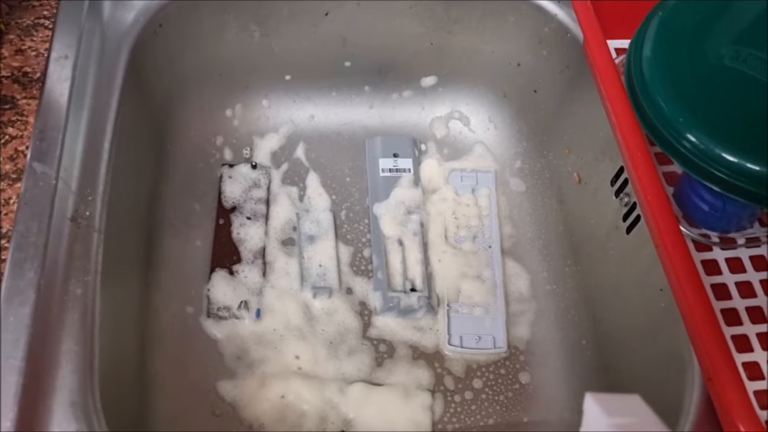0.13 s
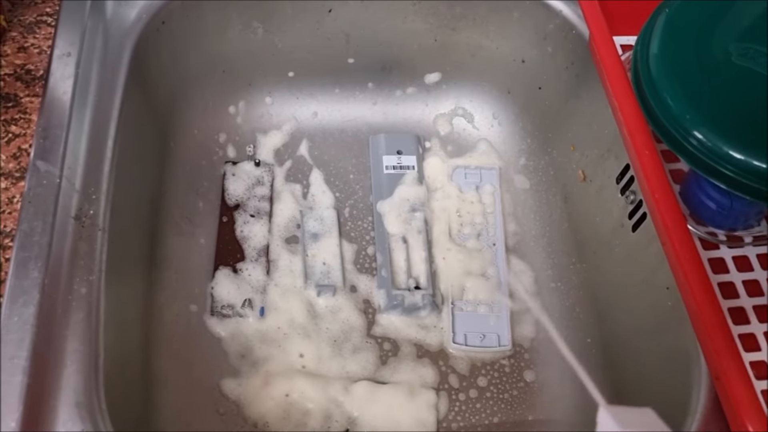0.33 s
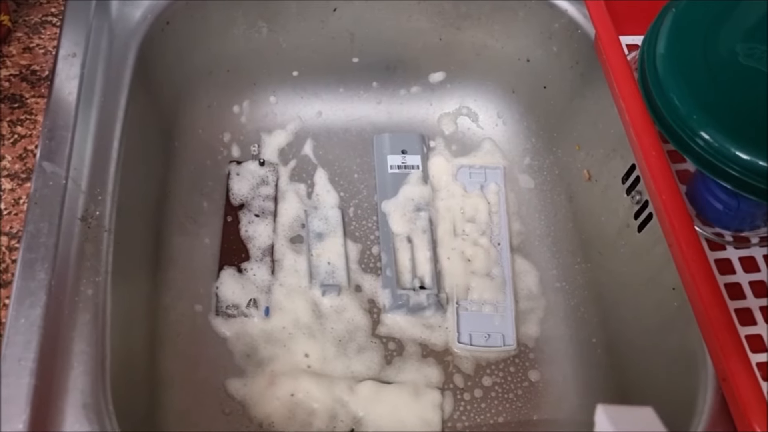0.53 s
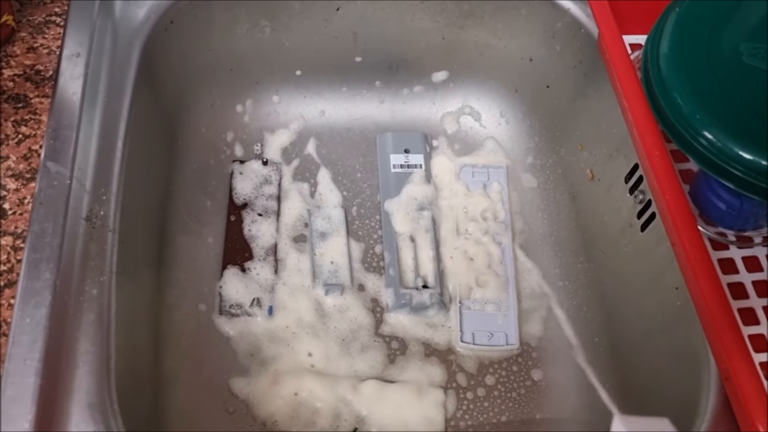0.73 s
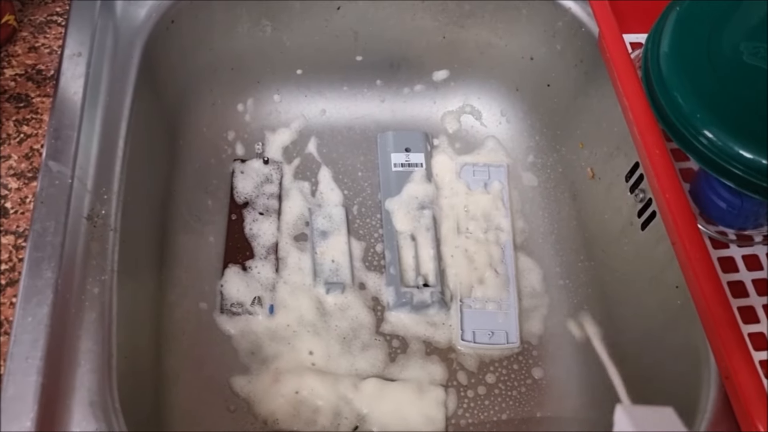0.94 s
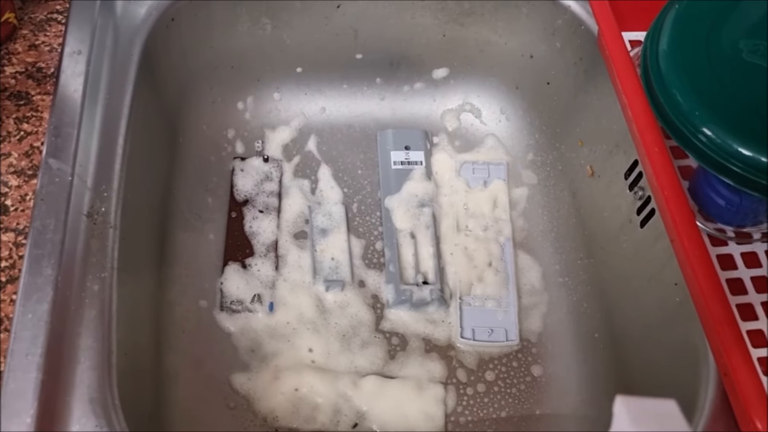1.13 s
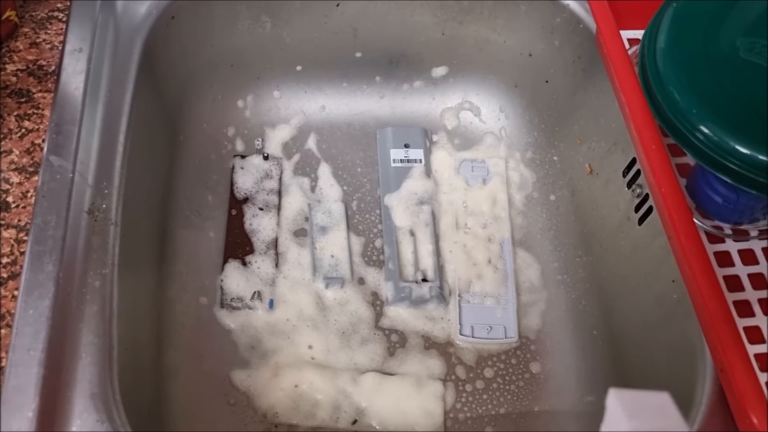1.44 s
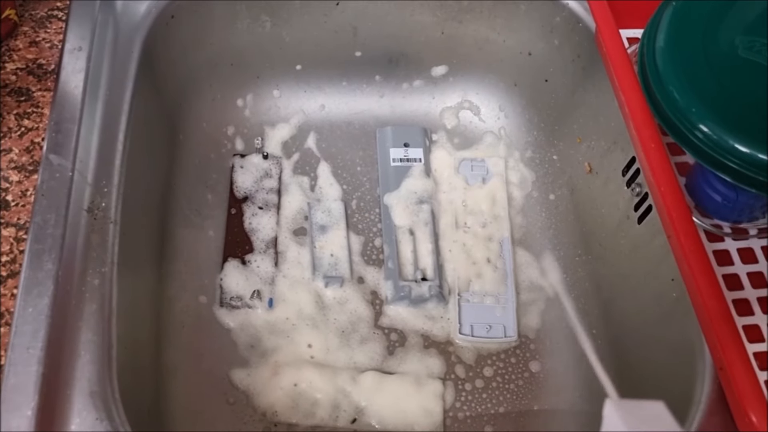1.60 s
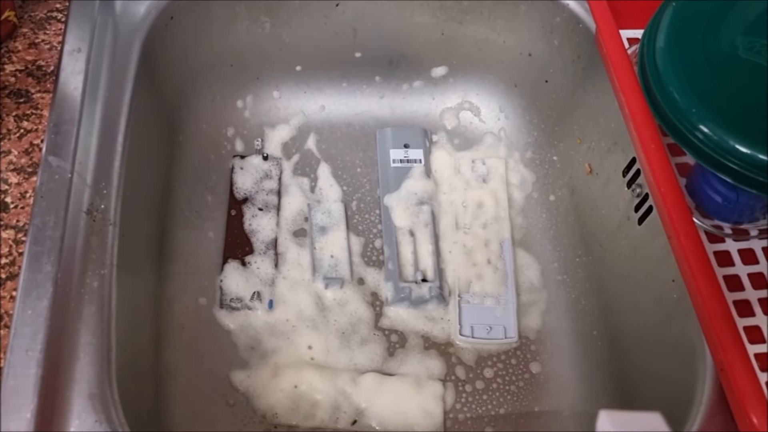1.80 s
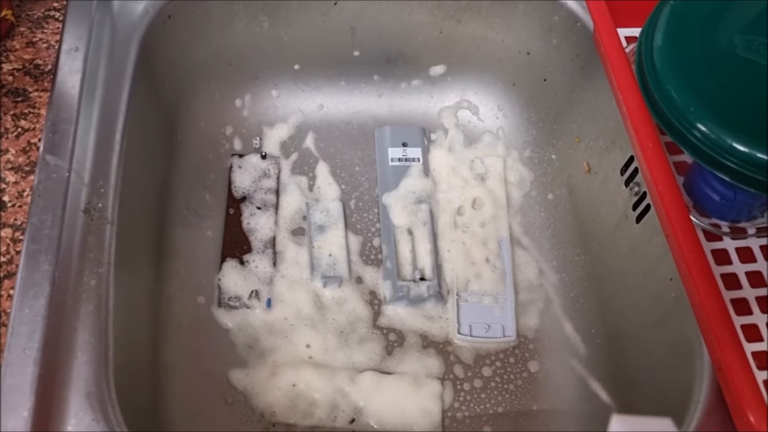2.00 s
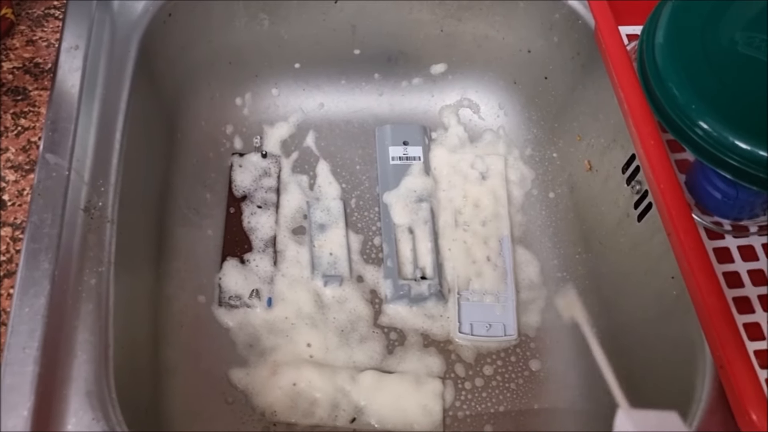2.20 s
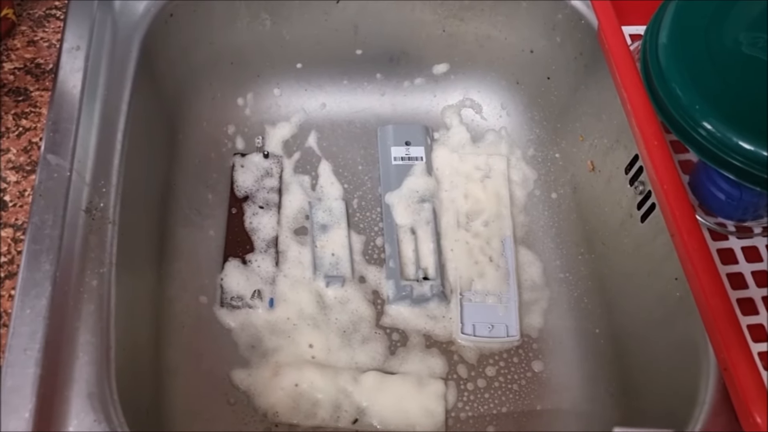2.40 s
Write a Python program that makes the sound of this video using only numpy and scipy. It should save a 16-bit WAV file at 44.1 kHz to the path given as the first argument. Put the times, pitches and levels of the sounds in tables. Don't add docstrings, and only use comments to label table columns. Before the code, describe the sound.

Trigger spray bottle pumped rapidly eight times, squirting hissing, whistling foamy jets into a kitchen sink.

```python
import sys
import numpy as np
from scipy import signal
from scipy.fft import rfft, irfft
from scipy.io import wavfile
from scipy.ndimage import uniform_filter1d

SR = 44100
rng = np.random.default_rng(int(sys.argv[2]) if len(sys.argv) > 2 else 0)


def boost_factor(decibels):
    exponent = np.asarray(decibels, float) / 20
    return 10 ** exponent


def pcm_store(signal):
    levels = np.round(np.clip(np.atleast_2d(signal), -1, 1) * 32767)
    wavfile.write(sys.argv[1], SR, levels.astype(np.int16).T)


N = 112454

# f/Hz, level/dB
ROOM_AIR = [(12, 0), (20, -19), (68, 6.5), (949, -9.5), (1330, 1.5), (1960, -16), (2750, -13),
            (3740, -17.5), (16000, -25.5)]
# f/Hz, likeness/1
AIR_LIKENESS = [(60, 0.86), (290, 0.61), (1400, 0.07), (3000, 0.07)]
# f/Hz, level/dB
HUM_PARTIALS = [(40.3, -60.5), (80.6, -61), (121, -71.5), (161.2, -65), (282, -77.5), (296, -70.5),
                (398, -75)]
# t/s, level/dB, f/Hz, t60/s
BODY_KNOCKS = [
    (.046, -36.5, 71.2, 0.28),
    (0.082, -32.5, 87.5, 0.11),
    (0.141, -38.5, 73.6, 0.094),
    (.182, -49, 304.7, 0.19),
    (0.215, -47, 287, 0.11),
    (0.576, -44.5, 153, 0.22),
    (.595, -47.5, 117, 0.31),
    (0.879, -55, 309.4, 0.33),
]
# t/s, pop level/dB, whistle level/dB, hiss level/dB, length/s
SQUEEZES = [
    (0.0485, -50, -38.5, -35, 0.17),
    (0.399, -44.5, -38, -37, .16),
    (0.721, -46, -39.5, -39.5, .16),
    (1.031, -46.5, -37.5, -39, .15),
    (1.3556, -43, -37, -38, .16),
    (1.6785, -43.5, -37, -36.5, 0.15),
    (1.9887, -42.5, -37, -38.5, .15),
    (2.2933, -45.5, -39, -42, .15),
]
# t/s, level/dB
PUMP_SUCKS = [
    (0.191, -49.5),
    (0.551, -52),
    (.873, -48.5),
    (1.186, -55),
    (1.501, -55),
    (1.82, -47),
    (2.138, -54),
    (2.439, -51),
]
# t/s, level/dB, brightness/dB
TRIGGER_TICKS = [(.005, -65, 13), (0.018, -51, -18), (.026, -46.5, -16), (0.191, -45, -15),
                 (0.209, -47, -16), (0.225, -38.5, -30), (0.262, -42.5, -6), (0.279, -47, -19),
                 (0.342, -54, 9), (.375, -47.5, -12), (0.38, -46.5, -3), (0.527, -40.5, -6),
                 (0.589, -45, -10), (0.61, -41.5, -20), (0.680, -54, 13), (0.682, -59, 12),
                 (0.702, -50, -8), (.705, -45.5, 4), (0.713, -51, -3), (.853, -42.5, -12), (0.874, -36, -1),
                 (0.917, -44.5, -4), (0.941, -45.5, -24), (1.017, -39, 3), (1.189, -47, -14),
                 (1.232, -46, 0), (1.329, -52, -13), (1.342, -39, 4), (1.499, -46.5, -8), (1.515, -44, -2),
                 (1.562, -39, -1), (1.663, -39, 2), (1.749, -44.5, -15), (1.87, -43, -6),
                 (1.912, -44.5, 5.5), (1.967, -52, -3), (1.9744, -43.5, -1), (1.978, -41, 12.5),
                 (2.177, -40.5, -4), (2.198, -48.5, -10), (2.276, -45.5, -3), (2.2811, -42, 9.5),
                 (2.474, -41.5, -12), (2.497, -49, -17)]
# f/Hz, level/dB, t60/s
HEAD_MODES = [(340, -19, .03), (580, -17, .03), (830, -13, .02), (1220, -4, .008), (1390, -1, .009),
              (1620, -6, .008), (2350, -10, .006), (2750, -7, .007), (3050, -3, .009)]
# f/Hz, level/dB
SNAP_COLOUR = [(2000, -64), (4000, 5), (5200, 12), (7300, 4), (9000, -2.5), (11000, -15.5), (16000, -20)]
# f/Hz, level/dB
SUCK_COLOUR = [(200, -20), (350, -3), (750, 0), (1000, -3), (1300, -2), (1900, -14), (2800, -12),
               (5000, -28)]
# f/Hz, width/Hz, level/dB
NOZZLE_MODES = [(2290, 130, -11), (2510, 110, -10), (2715, 105, 0), (2965, 90, -6), (3175, 80, -12)]
# f/Hz, level/dB
NOZZLE_SKIRTS = [(1500, -20), (2060, -26), (2230, 0), (3250, 0), (3600, -10)]
# f/Hz, width/Hz, level/dB
BARREL_MODES = [(1360, 70, -18)]
# f/Hz, level/dB
HISS_COLOUR = [(900, -32.5), (2000, 0), (3600, 8), (7600, 6.5), (8900, -1), (10500, 6), (13000, -18),
               (20000, -24.5)]
# f/Hz, width/Hz, level/dB
HISS_PEAKS = [(3900, 39, 6.5), (4125, 28, 6.5), (4338, 26, 4.5), (5135, 38, 11.5), (6280, 54, 6.5),
              (7150, 31, 17.5), (8000, 22.5, 11), (13000, 2470, 2.5), (16000, 150, 10)]
# f/Hz, level/dB
SIZZLE_COLOUR = [(6000, -31), (9000, -8), (10600, -1), (13000, -8), (14500, 4.5), (16000, 3)]
# f/Hz, level/dB
PORT_DIFFERENCE = [(200, -1.5), (700, -.5), (1290, 3), (2000, 1), (2750, -3.5), (4400, -4), (7000, -1),
                   (15000, -4)]

PORT_LAG = 4


def evened(x):
    return x / np.sqrt(np.mean(x ** 2) + 1e-20)


def smoothed_noise(size):
    once = uniform_filter1d(rng.standard_normal(N), size=size)
    return evened(uniform_filter1d(once, size=size))


def read(points, hz):
    f, value = np.transpose(points)
    return np.interp(np.log(hz + 1), np.log(f + 1), value)


def colour(x, points, scale=1):
    hz = abs(np.fft.fftfreq(4096, 1 / SR))
    log_gain = np.log(boost_factor(scale * read(points, hz)))
    spectrum = np.exp(log_gain - 1j * signal.hilbert(log_gain).imag)
    taps = np.fft.ifft(spectrum).real[:1024]
    return signal.oaconvolve(np.atleast_2d(x), taps[None], axes=1)[:, :N]


def resonate(x, peaks):
    t, taps = np.arange(1500) / SR, 0
    for k, (hz, width, db) in enumerate(peaks):
        ring = np.exp(-np.pi * width * t) * np.sin(2 * np.pi * hz * t)
        taps = taps + (-1) ** k * boost_factor(db) * 2 * np.pi * width / SR * ring
    return signal.oaconvolve(x, taps[None], axes=1)[:, :N]


def lowpass(x, hz):
    taps = signal.firwin(1201, hz, window=("kaiser", 8), fs=SR)
    return signal.oaconvolve(x, taps[None], "same")


def kitchen_air():
    hz, t = np.fft.rfftfreq(N, 1 / SR), np.arange(N) / SR
    a, b = rfft(rng.standard_normal((2, N)))
    same = np.clip(read(AIR_LIKENESS, hz), -1, 1)
    both = np.array([a, same * a + np.sqrt(1 - same ** 2) * b])
    air = irfft(both * boost_factor(read(ROOM_AIR, hz)), N)
    hum = 0
    for f, db in HUM_PARTIALS:
        level = boost_factor(db + 1.0 + 2.6 * smoothed_noise(5000))
        hum = hum + level * np.sin(2 * np.pi * (f * t + rng.random()) + 0.85 * smoothed_noise(5000))
    return boost_factor(-59) * evened(air) + hum


def bumps():
    t, knocks = np.arange(N) / SR, 0
    for start, db, hz, t60 in BODY_KNOCKS:
        decay = boost_factor(db - 60 * np.maximum(t - start, 0) / t60)
        attack = np.clip((t - start) / 0.002, 0, 1)
        knocks = knocks + decay * attack * np.sin(2 * np.pi * hz * (t - start))
    return knocks


def echoes(t60, first, step):
    size = SR // 2
    taps, t = np.zeros((2, size)), np.arange(size) / SR
    at = np.arange(first, size - step, step)
    jitter = rng.integers(0, step, (2, len(at)))
    np.put_along_axis(taps, at + jitter, rng.choice([-1., 1.], (2, len(at))), 1)
    low = signal.lfilter([.45], [1, -.55], taps)
    taps = low * boost_factor(-60 * t / t60) + (taps - low) * boost_factor(-60 * t / (0.12 * t60))
    taps = taps / np.linalg.norm(taps, axis=1, keepdims=True)
    return signal.lfilter([1, -1], [1, -.85], taps)


def burst(start, t60, rise=.0002):
    t = np.arange(N) / SR
    return np.clip((t - start) / rise, 0, 1) * boost_factor(-60 * np.maximum(t - start, 0) / t60)


def trigger():
    knock, snap, suck, crack = np.zeros((4, N))
    for start, db, bright_db in TRIGGER_TICKS:
        knock += boost_factor(db) * burst(start - .0005, .016, .001)
        snap += boost_factor(db + bright_db) * burst(start, 0.038)
    for start, pop_db, *_ in SQUEEZES:
        knock += boost_factor(pop_db - 1.5) * (burst(start, 0.071) + burst(start + 0.0092, .08))
        snap += boost_factor(-33) * (burst(start, .012) + .2 * burst(start, .06))
        suck += boost_factor(-50) * 1.4 * burst(start + .008, .15, .01)
        crack += boost_factor(-33) * burst(start, .012)
    for start, db in PUMP_SUCKS:
        suck += boost_factor(db) * burst(start, .22, 0.0033)

    knock_noise, snap_noise, suck_noise = rng.standard_normal((3, N))
    tau = np.arange(2500) / SR
    ring = sum(boost_factor(db - 60 * tau / t60) * np.sin(2 * np.pi * hz * tau) for hz, db, t60 in HEAD_MODES)
    rung = signal.oaconvolve(knock * np.sign(knock_noise), ring / np.linalg.norm(ring))
    head = colour(rung, [(150, -28), (330, -8), (950, -7), (1150, 0)])
    bubbles = evened(uniform_filter1d(rng.standard_normal(N), size=130))
    gurgle = evened(colour(suck_noise * boost_factor(4.5 * bubbles), SUCK_COLOUR))
    snaps = colour(snap * snap_noise, SNAP_COLOUR)
    cracks = colour(crack * snap_noise, [(3000, -35), (8000, -5)])
    mono = (boost_factor(6.5) * head + boost_factor(-6.0) * snaps + suck * gurgle + cracks)[0]
    return np.array([np.roll(mono, PORT_LAG), mono])


def spit():
    drops_per_s, drop_spread_db = 3000, 3
    sizes = boost_factor(drop_spread_db * np.minimum(rng.exponential(1, N), 3.5))
    drops = sizes * (rng.random(N) < drops_per_s / SR) * rng.standard_normal(N)
    flutter = boost_factor(1.5 * smoothed_noise(150))
    return (rng.standard_normal(N) + boost_factor(-7) * evened(drops)) * flutter


def splash(lag, spread):
    common, share = spit(), np.clip(spread, 0, 1)
    shared = np.array([np.roll(common, lag), common])
    return np.sqrt(1 - share) * shared + np.sqrt(share) * np.array([spit(), spit()])


def patchy(x):
    z = signal.stft(x, nperseg=256)[2]
    patches = uniform_filter1d(rng.standard_normal(z.shape[1:]), size=3, axis=0)
    patches = uniform_filter1d(patches, size=25, axis=1)
    return signal.istft(z * boost_factor(2.2 * evened(patches)), nperseg=256)[1][:, :N]


def jet():
    build, hold = 0.43, 0.59
    fizz_db, fizz_t60 = -12.5, 0.25
    whistle, hiss, sizzle, fizz = np.zeros((4, N))
    t = np.arange(N) / SR
    for start, pop_db, whistle_db, hiss_db, length in SQUEEZES:
        u = np.clip((t - start) / length, 0, 1)
        pressure = np.sin(np.pi / 2 * np.interp(u, [0, build, hold, 1], [0, 1, 1, 0])) ** 2
        gush = boost_factor(-6 + 1.1 * (pop_db - hiss_db + 6.5)) * (t >= start) * (1 - u) ** 2
        whistle += boost_factor(whistle_db) * (pressure ** 0.56 + 0.3 * gush)
        hiss += boost_factor(hiss_db) * (pressure ** 1.27 + 0.98 * gush)
        sizzle += boost_factor(2.5 - 39.5 + 1.5 * (hiss_db + 37.5)) * (pressure ** 1.6 + 0.17 * gush)
        fizz += u ** 2 * boost_factor(fizz_db - 60 * np.maximum(t - start - length, 0) / fizz_t60)

    narrow_spray = splash(1, 0.21)
    wide_spray = patchy(splash(PORT_LAG, 0.67))
    nozzle = colour(resonate(narrow_spray, NOZZLE_MODES), NOZZLE_SKIRTS)
    tone = evened(nozzle + resonate(narrow_spray, BARREL_MODES))
    wide = evened(colour(wide_spray, HISS_COLOUR) + resonate(wide_spray, HISS_PEAKS))
    fine = evened(colour(wide_spray, SIZZLE_COLOUR))
    dull = colour(wide, [(5000, 0), (12000, -7.5)])
    return (whistle + boost_factor(-40.5) * fizz) * tone + hiss * wide + sizzle * fine + boost_factor(-35.0) * fizz * dull


def scene():
    bottle = jet() + trigger()
    sink = boost_factor(-12) * echoes(.04, 30, 30)
    kitchen = boost_factor(-13) * echoes(.3, 300, 20)
    reflected = signal.fftconvolve(bottle[1:], sink + kitchen, axes=1)[:, :N]
    left, right = (bottle + reflected) * boost_factor(-0.5)
    ports = np.vstack([colour(left, PORT_DIFFERENCE, scale=.5), colour(right, PORT_DIFFERENCE, scale=-.5)])
    return ports + bumps() + kitchen_air()


def top_cut(x):
    return signal.sosfilt(signal.butter(12, 16820, fs=SR, output="sos"), x)


def record(dry):
    open_s, starve_s = .005, .011
    narrow, t = lowpass(dry, 15750), np.arange(N) / SR
    wide = sum(np.clip(2 - 2 * abs(t - row[0]) / open_s, 0, 1) for row in SQUEEZES)
    starved = sum((t > row[0] - starve_s) & (t < row[0] - .001) for row in SQUEEZES)
    treble = narrow - lowpass(dry, 4000)
    lost = treble * uniform_filter1d(starved * (1 - boost_factor(-12)), size=40)
    top = boost_factor(-9) * wide * (lowpass(dry, 16500) - narrow)
    return top_cut(narrow - lost + top)


dry = scene()
out = record(dry)
pcm_store(out)
```